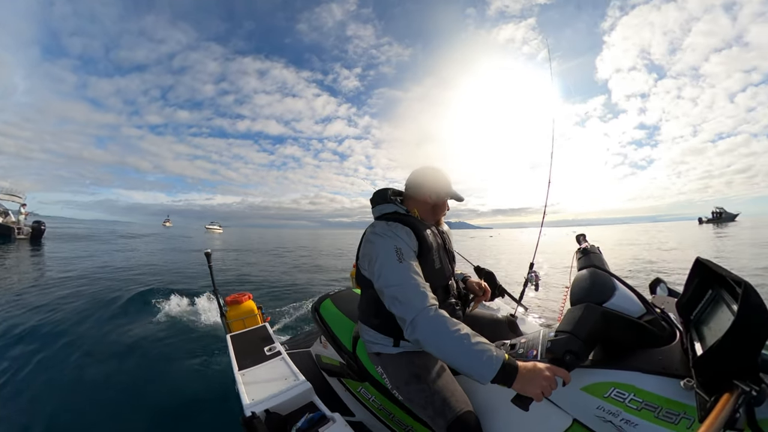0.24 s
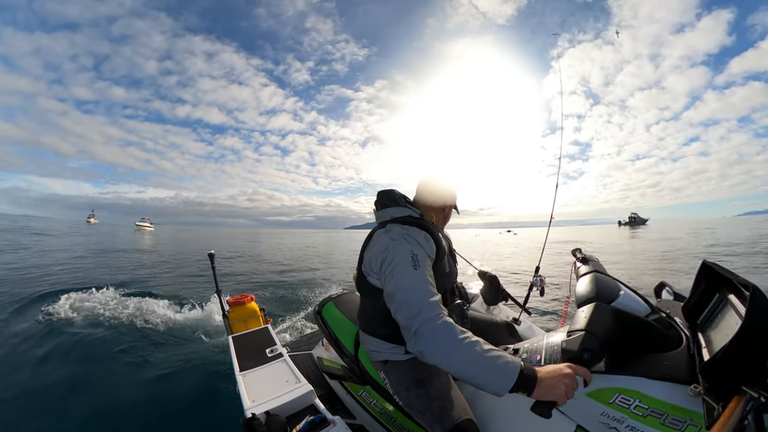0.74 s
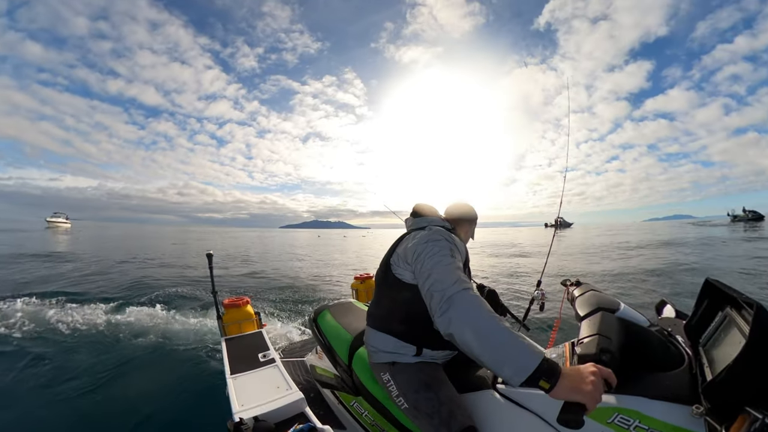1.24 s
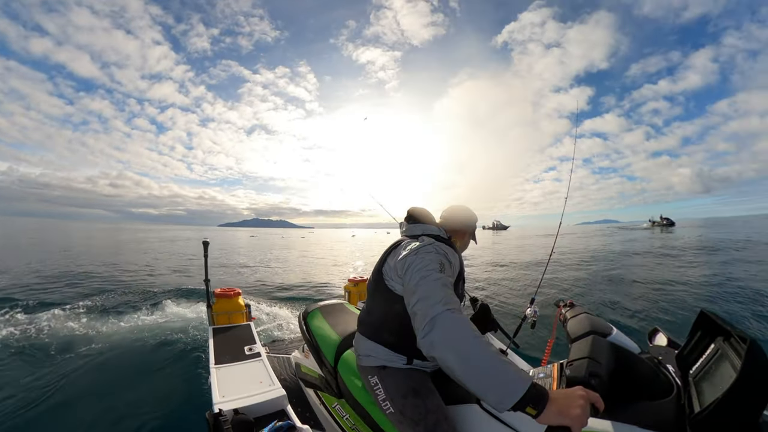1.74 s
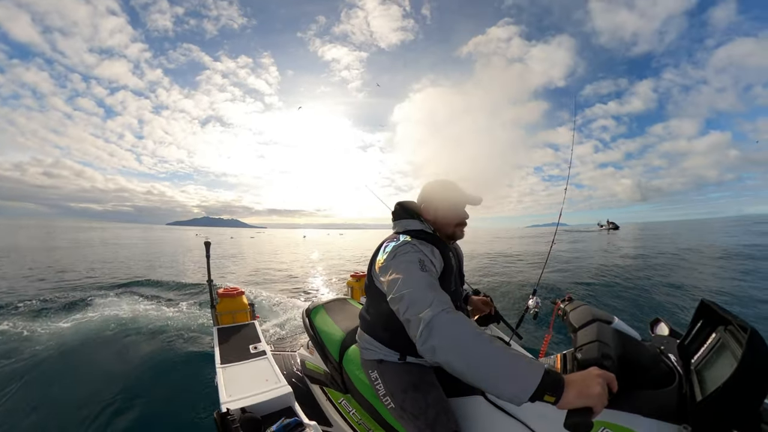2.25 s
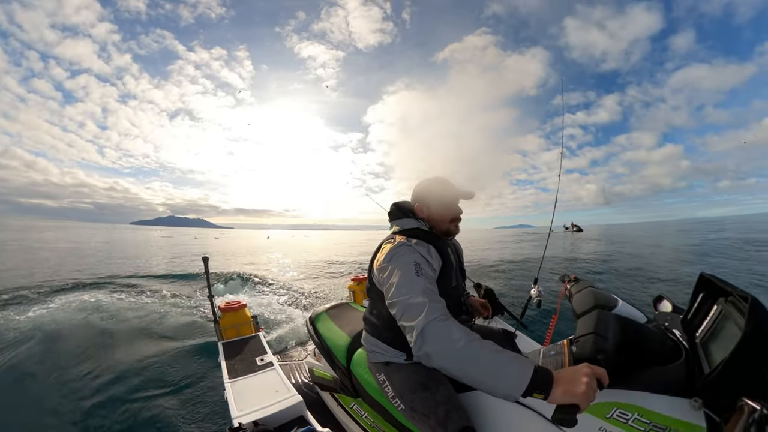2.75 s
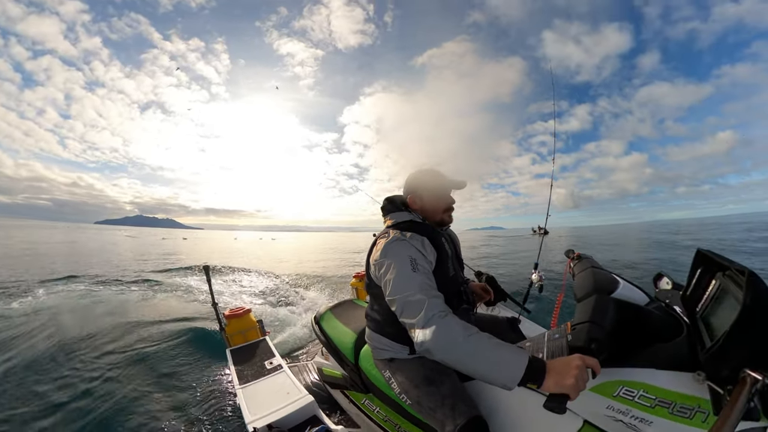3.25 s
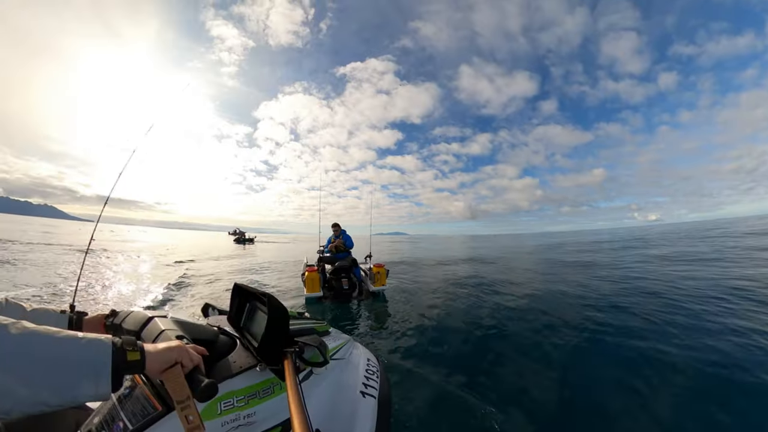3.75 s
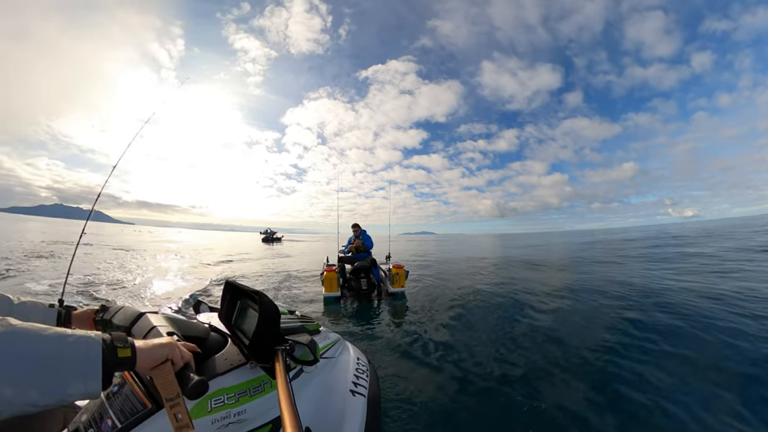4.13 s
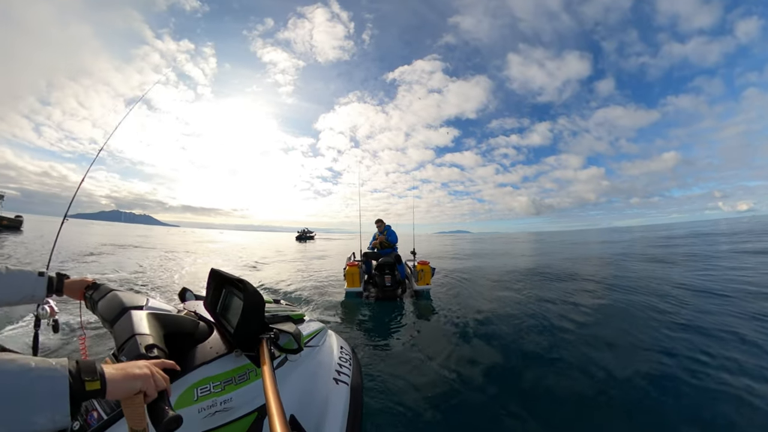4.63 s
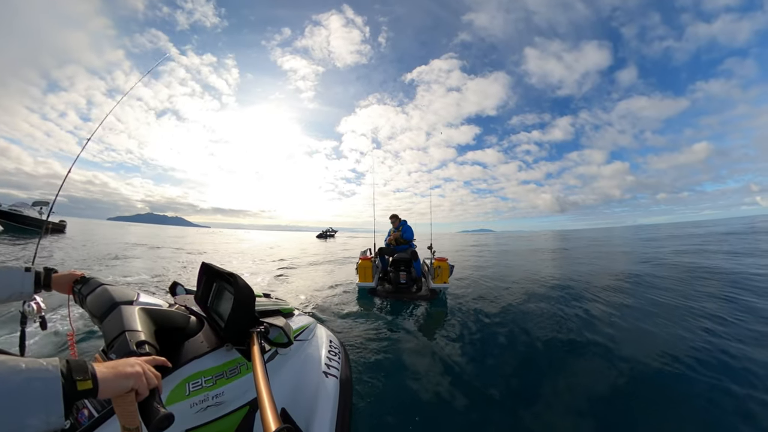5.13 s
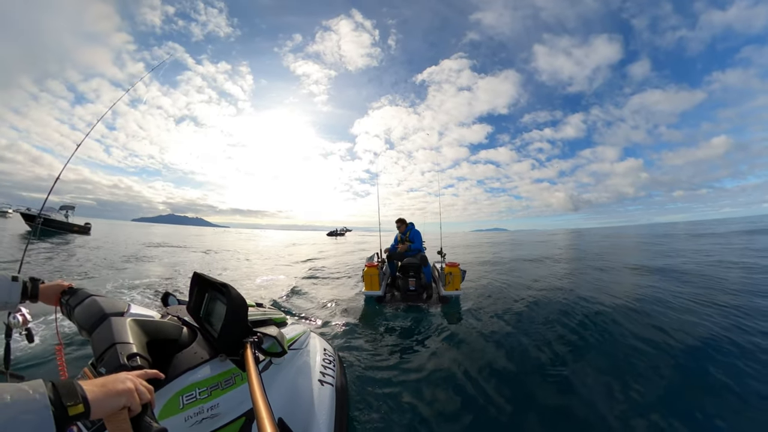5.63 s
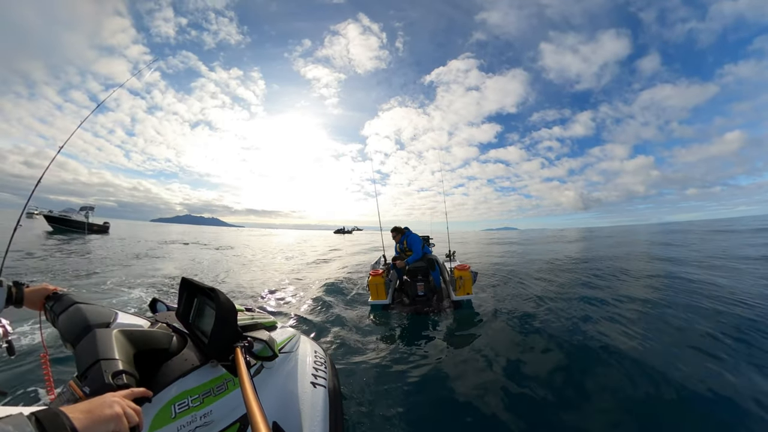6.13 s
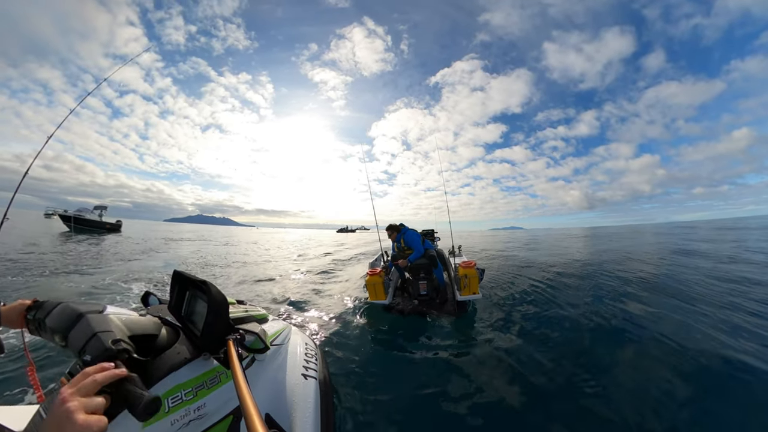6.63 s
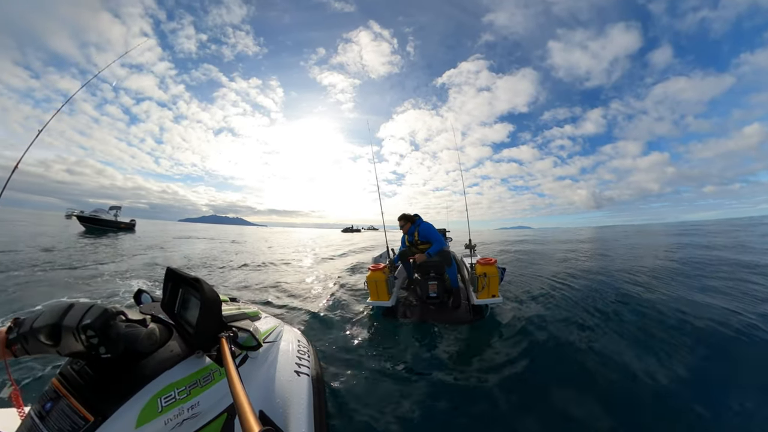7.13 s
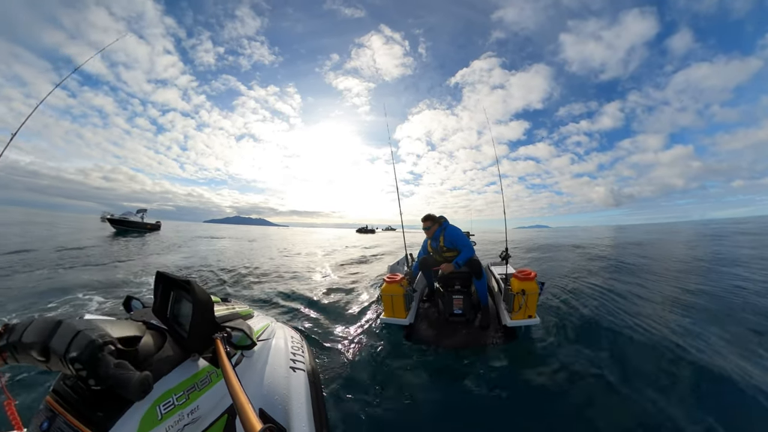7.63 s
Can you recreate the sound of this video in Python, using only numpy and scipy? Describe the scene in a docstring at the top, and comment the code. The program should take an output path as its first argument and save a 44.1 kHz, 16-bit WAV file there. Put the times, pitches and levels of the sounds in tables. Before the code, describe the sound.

A microphone on the watercraft itself hears a throaty engine drone over churning, bubbly jet wash. The engine drops off, something thumps the hull, and it revs up brighter than before. Soon it settles to a soft lumpy idle with one quick rev, then slows almost to a putter, with small splashes, a stronger slap near the end and wandering low rumble. Dry, open and close.

```python
"""On calm open water, aboard a jet ski. Its four-cylinder engine drones, eases off, something thumps the hull,
and it revs up again. The scene then dissolves into an engine at a low burbling idle, with one blip of throttle.
The engine is a stack of sine tones plus noisy exhaust pulses. The jet wash hisses astern as bubbles on noise,
small waves slap the hull as short noise bursts, gas gurgles up through the water and a low rumble lies
underneath."""
import sys
import numpy as np
from scipy import signal
from scipy.fft import rfft, irfft, next_fast_len
from scipy.io import wavfile
from scipy.ndimage import uniform_filter1d

SR = 44100
rng = np.random.default_rng(int(sys.argv[2]) if len(sys.argv) > 2 else 0)


def to_wav(s):
    """Save 16-bit WAV."""
    ch = np.atleast_2d(s).T  # columns
    pcm = np.round(np.clip(ch, -1, 1) * 32767)  # PCM
    wavfile.write(sys.argv[1], SR, pcm.astype(np.int16))


N = 347508  # length in samples


def from_db(db):
    """Turn decibels into a gain."""
    return 10 ** (np.asarray(db) / 20)


def rms_one(x):
    """Scale a sound to unit power."""
    return x / np.sqrt(np.mean(x ** 2) + 1e-20)


def in_time(rows):
    """Draw each column of a table as a curve through time, one value per sample."""
    seconds, *columns = np.transpose(rows)
    return [np.interp(np.arange(N) / SR, seconds, column) for column in columns]


def at_hz(spectrum, hz):
    """Read a spectrum's dB at these frequencies."""
    points, db = np.transpose(spectrum)
    return np.interp(np.log(hz), np.log(points), db)


def swell(s, width_s):
    """Rise smoothly to 1 and fall again around time s."""
    return np.exp(-0.5 * ((np.arange(N) / SR - s) / width_s) ** 2)


def drift(rate_hz):
    """Wander slowly at random around 0 with spread 1: smoothed noise, made at every 40th sample."""
    r = np.exp(-80 * np.pi * rate_hz / SR)
    noise = rng.standard_normal(N // 40 + 2002)
    slow = signal.lfilter([1], [1, -2 * r, r * r], noise)[2000:]  # skip the filter's start
    return np.interp(np.arange(N) / 40, np.arange(len(slow)), rms_one(slow))


def coloured(x, spectrum):
    """Give a steady sound a spectrum, at unit power."""
    size = next_fast_len(N)
    bins_hz = np.maximum(np.arange(size // 2 + 1) * SR / size, 1)
    shaped = rfft(x, size) * from_db(at_hz(spectrum, bins_hz))
    return rms_one(irfft(shaped, size)[:N])


def resonate(x, hz, width_hz):
    """Pass a sound through a resonance whose peak gain is 1."""
    r = np.exp(-np.pi * width_hz / SR)
    top = np.array([1, 0, -1]) * (1 - r * r) / 2
    return signal.lfilter(top, [1, -2 * r * np.cos(2 * np.pi * hz / SR), r * r], x + 1e-18)


def ring(clicks, hz, t60):
    """Let each unit click start a sine of height 1 that dies by 60 dB in t60 seconds."""
    r, w = 1000 ** (-1 / (t60 * SR)), 2 * np.pi * hz / SR
    return signal.lfilter([0, np.sin(w)], [1, -2 * r * np.cos(w), r * r], clicks + 1e-18)


def add(out, s, sound):
    """Mix a short sound in at time s."""
    at = int(s * SR)
    out[at:at + len(sound)] += sound[:N - at]


def burst(t60, rise_s):
    """Make noise that swells quickly and dies away."""
    t = np.arange(SR // 2) / SR
    return rng.standard_normal(len(t)) * (1 - np.exp(-t / rise_s)) * 1000 ** (-t / t60)


# How the low rumble rises and falls. Each row: time in seconds, level in dB before the 3 dB lift below.
RUMBLE_LEVEL = [(0, -41.5), (1.1, -43), (1.75, -26), (2.15, -30.5), (2.6, -45.5), (3.9, -32.5),
                (4.9, -27.5), (6.5, -40), (7.6, -35)]
# The colour of the low rumble. Each row: frequency in Hz, strength in relative dB.
RUMBLE_COLOUR = [(10, -14), (25, -2.5), (38, 0), (60, 2), (100, 1.5), (250, -16), (800, -70)]


def rumble():
    """Low, lumpy rumble: low noise whose level wanders."""
    rumble_db, = in_time(RUMBLE_LEVEL)
    return from_db(rumble_db + 3.0 + 2.6 * drift(21.0)) * coloured(rng.standard_normal(N), RUMBLE_COLOUR)


def bubbles(per_s, low_hz, high_hz, cycles, spread_db, count=20):
    """Bubbles of random size and pitch, each ringing a few cycles, at unit power."""
    sizes = from_db(spread_db * np.minimum(rng.exponential(1, N), 4)) * rng.choice([-1, 1], N)
    chance = per_s * from_db(4 * drift(7)) / SR  # bubbles come thicker and thinner
    clicks = sizes * (rng.random(N) < chance)
    dealt = rng.integers(0, count, N)  # which pitch each bubble gets
    out = 0
    for k, hz in enumerate(np.geomspace(low_hz, high_hz, count)):
        out = out + hz * ring(clicks * (dealt == k), hz, cycles / hz)
    return rms_one(out)


# The colour of the churned water. Each row: frequency in Hz, strength in relative dB.
CHURN_COLOUR = [(200, -6), (450, 5), (700, 2.5), (1000, 0.5), (1500, -3.5), (2200, -16.5), (3200, -21),
                (5000, -24), (9000, -48.5)]
# The colour of the fine spray. Each row: frequency in Hz, strength in relative dB.
SPRAY_COLOUR = [(900, 8.5), (2000, 8.5), (3000, 2.5), (4000, -1.5), (4700, -4), (5150, -1.5), (6200, -6.5),
                (7400, -6.5), (8300, -14.5), (9200, -21), (11200, -30.5), (12500, -32.5), (15500, -36)]
# The spray of the wake. Each row: time in seconds, level in dB before the swells and the 4 dB lift below.
WAKE_SPRAY = [(0.03, -56), (0.9, -54), (2.08, -46.5), (2.47, -42.5), (3.19, -41.5), (3.36, -45),
              (5.21, -51.5), (5.54, -59.5), (6.06, -61), (6.35, -55), (7.09, -56.5), (7.52, -50.5),
              (7.85, -57)]
# Swells of the churned water and spray.
# Each row: time of the peak in seconds, width in seconds, extra churning in dB, extra spray in dB.
WASH_SWELLS = [(.2, 0.083, 3.5, 1.5), (1.14, 0.055, 4.5, -1), (1.8, 0.31, 5.5, -1), (2.4, 0.19, 2.5, 1),
               (3.32, 0.091, 2, 2.5), (3.85, .08, 6, 4.5), (4.15, 0.38, 3.5, 3), (4.63, 0.048, 6.5, 3.5),
               (5.15, 0.36, 2.5, 6), (6.15, 0.059, 11.5, -1), (6.31, 0.11, 10, -1.5),
               (6.58, 0.13, 5.5, 1.5)]
# The jet churns harder as the engine turns faster: base level, at this many firings per second, and slope.
CHURN_DB, CHURN_AT_HZ, CHURN_DB_PER_OCTAVE = -37.5, 98.9, 13


def wash(rate, throb):
    """Churned water and fine spray: bubbles on hiss that pulses with the firings and swells now and then."""
    churn_db = CHURN_DB + CHURN_DB_PER_OCTAVE * np.log2(rate / CHURN_AT_HZ)
    spray_db, = in_time(WAKE_SPRAY)
    for s, width_s, more_churn_db, more_spray_db in WASH_SWELLS:
        rise = swell(s, width_s)
        churn_db = churn_db + more_churn_db * rise
        spray_db = spray_db + more_spray_db * rise
    churn_hiss = rng.standard_normal(N) * (1 + 0.25 * throb)
    big_bubbles = bubbles(900, 358, 3620, cycles=9.3, spread_db=-0.5)
    churn = coloured(churn_hiss + 0.57 * big_bubbles, CHURN_COLOUR)
    spray_hiss = rng.standard_normal(N) * (1 + 0.13 * throb)
    small_bubbles = bubbles(2500, 2000, 9900, cycles=6.8, spread_db=3.5)
    spray = coloured(spray_hiss + 0.5 * small_bubbles, SPRAY_COLOUR)
    churn = from_db(churn_db + 0.23 * drift(39)) * churn
    return churn + from_db(spray_db + 4.0 + 0.5 * drift(57)) * spray


# Waves slapping and splashing. Each row: start in seconds, level in dB before the 2 dB cut below,
# bubble pitch in Hz, time to die by 60 dB in seconds.
WAVE_SLAPS = [(1.036, -25.5, 550, 0.087), (1.2, -23, 700, 0.18), (3.839, -27.5, 1070, 0.092),
              (4.601, -29, 1090, 0.31), (5.655, -28, 433, 0.056), (5.845, -42, 4360, 0.04),
              (6.052, -27.5, 730, 0.052), (6.135, -27, 1290, 0.044), (6.165, -40, 2250, 0.29),
              (6.201, -30, 900, 0.036), (6.305, -40, 1780, 0.13), (6.481, -39, 2200, 0.072),
              (6.609, -38.5, 2940, 0.091), (6.654, -37, 1660, 0.079), (6.83, -46, 2980, 0.13),
              (7.115, -45, 4005, 0.16), (7.29, -33.5, 643, 0.11), (7.39, -51, 5450, 0.42),
              (7.429, -26.5, 680, .05), (7.564, -16.5, 420, 0.081), (7.571, -21, 1240, 0.031)]


def slaps():
    """Each wavelet throws a short splash of noise around the pitch of its bubbles."""
    out = np.zeros(N)
    for s, db, hz, t60 in WAVE_SLAPS:
        width_hz = 0.59 * hz
        splash = burst(t60, rise_s=0.0008)
        splash = resonate(resonate(splash, hz, width_hz), hz, width_hz)
        make_up = np.sqrt(SR / width_hz / 2)  # a narrow resonance lets less noise through
        add(out, s, from_db(db - 2.0) * make_up * splash)
    return out


# Exhaust gas gurgling up through the water.
# Each row: time of the peak in seconds, width in seconds, level in dB, bubble pitch in Hz.
GAS_RUSHES = [(1.06, 0.021, -31, 480), (1.215, .025, -28.5, 475), (1.44, 0.044, -25, 329),
              (2.36, 0.044, -22, 328), (4.55, 0.039, -20.5, 156), (4.755, 0.065, -17.5, 344),
              (4.97, 0.11, -31, 170), (6.15, 0.026, -35.5, 320), (6.68, 0.12, -30, 163),
              (7.59, 0.041, -31.5, 339)]
GURGLE_WIDTH = 0.31  # width of each resonance as a share of the bubble pitch
GURGLE_THROB = 0.6  # depth of the firing pulse


def gurgles(throb):
    """Each rush of gas is a cloud of big bubbles: noise near one pitch that pulses with the firings."""
    out = 0
    for s, width_s, db, hz in GAS_RUSHES:
        gas = rng.standard_normal(N) * (1 + GURGLE_THROB * throb)
        width_hz = GURGLE_WIDTH * hz
        cloud = resonate(resonate(gas, hz, width_hz), hz, width_hz)
        loudness = np.sqrt(uniform_filter1d(cloud ** 2, size=SR // 20) + 1e-12)
        out = out + from_db(db) * swell(s, width_s) * cloud / loudness
    return out


# Blows on the hull. Each row: start in seconds, strength of the thump in dB,
# strength of the crack in dB before its filters.
BLOWS = [(1.7069, -14, -21.5), (1.712, -0.5, -37), (1.718, -8, -24.5), (1.727, 0.5, -29),
         (1.753, -7.5, -33)]
# The notes the struck hull rings with. Each row: pitch in Hz, level in dB, time to die by 60 dB in seconds.
HULL_NOTES = [(62.4, -9, 0.18), (111, -22, 0.087), (175, 0, 0.076), (218, -10.5, 0.16), (327, -20.5, 0.15),
              (413, -8.5, 0.054), (535, -18, 0.02), (746, -41, 0.035)]


def thump():
    """A clattering blow: a bright crack of noise on top of the hollow ring of the hull."""
    clicks, crack = np.zeros(N), np.zeros(N)
    for s, thump_db, crack_db in BLOWS:
        add(clicks, s, from_db([thump_db]))
        add(crack, s, from_db(crack_db) * burst(t60=0.077, rise_s=0.00067))
    body = sum(from_db(db) * ring(clicks, hz, t60) for hz, db, t60 in HULL_NOTES)
    bright = 2.43 * resonate(crack, 1500, 830)
    bright += 2.75 * resonate(crack, 1900, 670)
    bright += 0.083 * resonate(crack, 5700, 2300)
    soften = signal.butter(2, 7500, fs=SR, output="sos")
    return body + signal.sosfilt(soften, bright)


# How strongly the hull radiates an engine tone passing each pitch. Each row: frequency in Hz, gain in dB.
HULL_RADIATION = [(45, -26.5), (55, -14), (68, -1.5), (86, -2), (112, 0.7), (135, 0.5), (153, -1.5),
                  (170, 5), (192, -4), (203, 6.5), (218, 6.5), (232, -1), (250, -3.5), (272, -0.5),
                  (300, 1.5), (332, -15), (372, 2), (392, 4), (432, 1), (510, -13), (590, -7)]


def drone(rate, orders, bright, waver_db, side_waver_db, wobble):
    """Engine tones radiated by the hull; the firing tone wavers least, the others also scale with bright."""
    firings, out = np.cumsum(rate) / SR, 0
    for multiple, db in orders:
        gain, depth_db = (1, waver_db) if multiple == 1 else (bright, side_waver_db)
        turn = 2 * np.pi * (multiple * firings + rng.random()) + wobble * depth_db * drift(13.2)
        level_db = db + at_hz(HULL_RADIATION, multiple * rate) + depth_db * drift(7.5)
        out = out + gain * from_db(level_db) * np.sin(turn)
    return np.sqrt(2) * out


# Resonances of the exhaust box and hull. Each row: pitch in Hz, width in Hz, relative level in dB.
EXHAUST_BOX = [(109, 65, -0.5), (207, 70, 4.5), (320, 80, 2), (379, 70, 0), (524, 156, -12.5)]


def rasp(firings, uneven_db, gas):
    """Each firing sends an uneven pulse and a puff of gas through the exhaust box; the level is evened out."""
    fired = np.diff(np.floor(firings), prepend=0) > 0
    strength_db = uneven_db * np.clip(rng.standard_normal(N), -2, 2)
    pulses = rms_one(fired * from_db(strength_db))
    puffs = rms_one(rng.standard_normal(N) * np.exp(-3 * (firings % 1)))
    box = 0
    for k, (hz, width_hz, db) in enumerate(EXHAUST_BOX):
        sign = (-1) ** k  # neighbouring resonances have opposite signs
        box = box + sign * from_db(db) * resonate(pulses + gas * puffs, hz, width_hz)
    return box / np.sqrt(uniform_filter1d(box ** 2, size=SR // 10) + 1e-12)


# The engine under way. Each row: time in seconds, firings per second, engine level in dB.
RUN_COURSE = [(0.03, 112, -11), (0.27, 107.9, -12.5), (0.69, 112.4, -12), (0.85, 100.2, -14),
              (1.16, 98.0, -15), (1.34, 93, -13), (1.52, 75.6, -21.5), (1.94, 66.2, -23),
              (2.01, 67.9, -23.5), (2.07, 85, -19.5), (2.18, 100.4, -14.5), (2.25, 115, -14),
              (2.35, 128.9, -10), (2.44, 132, -11.5), (2.86, 130.2, -10.5), (3.33, 127.5, -10.5)]
# The engine idling, before the blip. Each row: time in seconds, firings per second, engine level in dB.
IDLE_COURSE = [(3.5, 67.06, -19.5), (3.78, 60.03, -21), (4.02, 69.68, -20), (4.42, 60.1, -23),
               (5.08, 61.56, -22.5), (5.6, 54.8, -29.5), (6.2, 46.92, -29), (6.65, 44.64, -27),
               (6.93, 56, -22.5), (7.12, 69, -27.5), (7.44, 78.44, -24.5), (7.7, 69.73, -31),
               (7.88, 61.04, -29)]
# Unequal cylinders add tones between the main ones. These are the tones under way.
# Each row: multiple of the firing rate, level in dB before the hull colours it.
RUN_TONES = [(.5, -24.5), (.75, -28), (1, 0.5), (1.25, -29), (1.5, -13.5), (1.75, -35.5), (2, -12.5),
             (2.25, -31.5), (2.5, -25.5), (3, -15), (3.5, -25.5), (4, -26.5), (4.5, -30), (5, -25.5)]
# The same at idle. Each row: multiple of the firing rate, level in dB before the hull colours it.
IDLE_TONES = [(.5, -11), (1, 1), (1.5, -7), (2, -4.5), (2.5, -15.5), (3, -10), (3.5, -24), (4, -22),
              (5, -22.5), (6, -31)]
# The exhaust barks when the throttle moves or its outlet dips under.
# Each row: time of the peak in seconds, width in seconds, extra rasp in dB.
BARKS = [(.05, .1, 6), (.8, .05, 4.5), (1.06, 0.024, 6), (1.22, .05, 7), (1.44, 0.066, 9.5),
         (1.86, 0.086, 8), (2.33, 0.096, 8), (2.65, 0.14, 8), (3.82, 0.045, 8.5), (4.53, 0.028, 7),
         (4.75, 0.11, 9.5), (6.68, 0.082, 5), (7.5, 0.21, 6.5)]
RUN_RASP_DB, IDLE_RASP_DB = -16, -11.5  # exhaust rasp against the engine level, before the barks
FADE_START_S, FADE_END_S = 3.3, 3.78  # the drone gives way to the idle
# One flick of the throttle at idle: time, width, extra firings per second, extra level.
BLIP_S, BLIP_WIDTH_S, BLIP_RISE_HZ, BLIP_DB = 4.69, 0.085, 56, 6


def engine():
    """Tones and exhaust rasp under way, then at a burbling idle; also returns the firing rate and its throb."""
    idle_on = np.clip((np.arange(N) / SR - FADE_START_S) / (FADE_END_S - FADE_START_S), 0, 1)
    run_on = 1 - idle_on
    bark_db = sum(db * swell(s, width_s) for s, width_s, db in BARKS)

    run_rate, run_db = in_time(RUN_COURSE)
    run_firings = np.cumsum(run_rate) / SR
    run = drone(run_rate, RUN_TONES, bright=np.sqrt(run_on), waver_db=-0.5, side_waver_db=1.7, wobble=0.11)
    run += from_db(RUN_RASP_DB + bark_db) * rasp(run_firings, uneven_db=4.0, gas=1.12)

    idle_rate, idle_db = in_time(IDLE_COURSE)
    blip = swell(BLIP_S, BLIP_WIDTH_S)
    idle_rate = idle_rate + BLIP_RISE_HZ * blip
    idle_db = idle_db + BLIP_DB * blip
    idle_firings = np.cumsum(idle_rate) / SR
    idle = drone(idle_rate, IDLE_TONES, bright=0.86, waver_db=1.4, side_waver_db=2.5, wobble=0.11)
    idle += from_db(IDLE_RASP_DB + bark_db) * rasp(idle_firings, uneven_db=4.0, gas=1.0)

    motor = run_on * from_db(run_db) * run + idle_on * from_db(idle_db) * idle
    rate = run_on * run_rate + idle_on * idle_rate
    throb = run_on * np.cos(2 * np.pi * run_firings) + idle_on * np.cos(2 * np.pi * idle_firings)
    return motor, rate, throb


def scene():
    """Add all the sources; everything is close by, and open water gives no echo."""
    motor, rate, throb = engine()  # first, because the water follows its rate and throb
    water = wash(rate, throb) + slaps() + gurgles(throb)
    return (rumble() + water + thump() + motor)[None]


def record(dry):
    """Peaks stop at full scale and the treble above 15.7 kHz is cut."""
    top_cut = signal.cheby2(12, 70, 15700, fs=SR, output="sos")
    return signal.sosfilt(top_cut, np.clip(dry, -1, 1))


dry = scene()
out = record(dry)
to_wav(out)
```